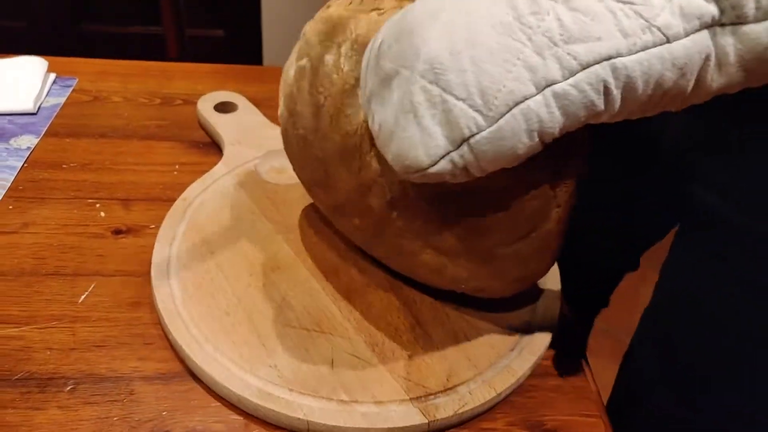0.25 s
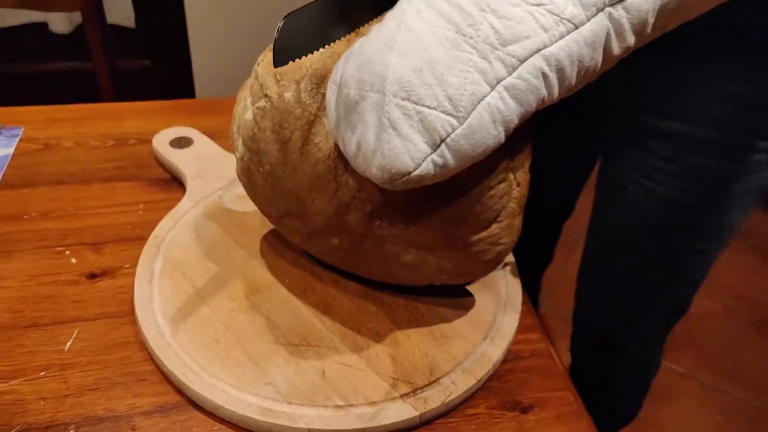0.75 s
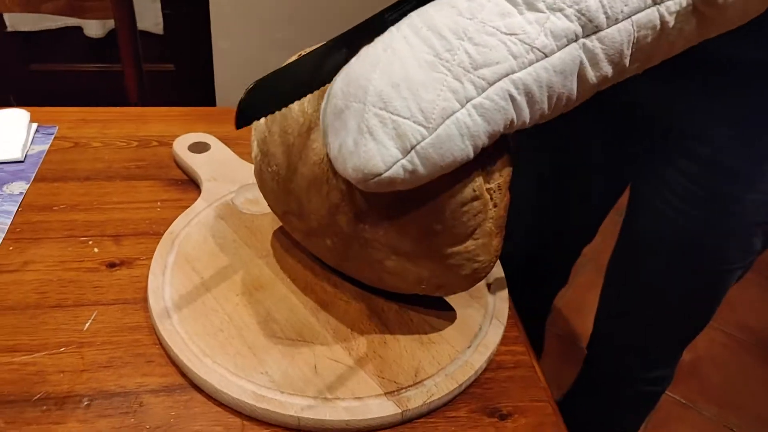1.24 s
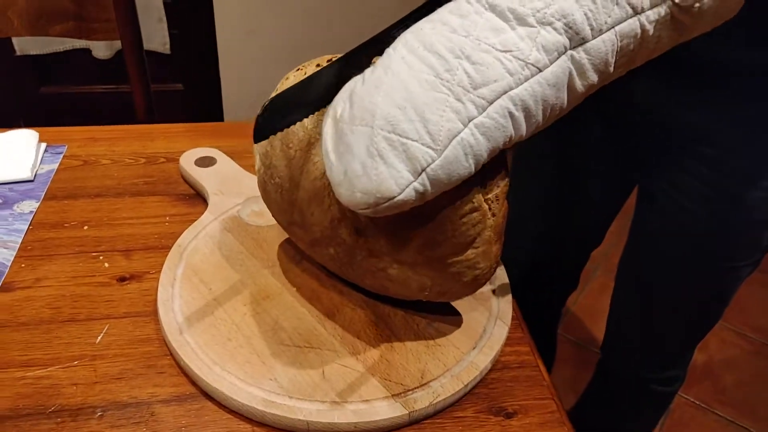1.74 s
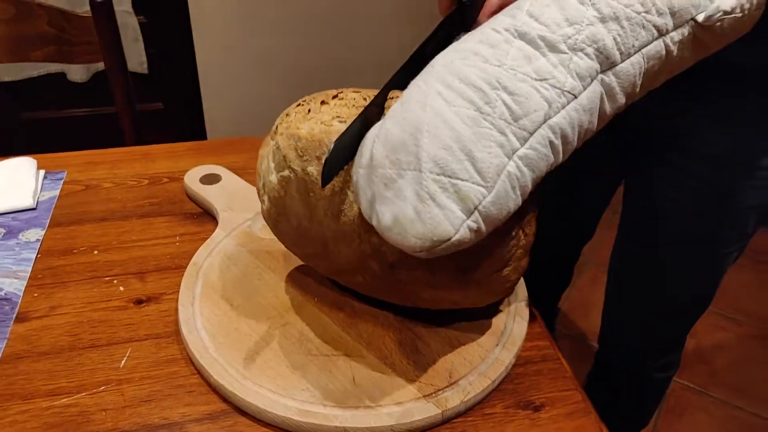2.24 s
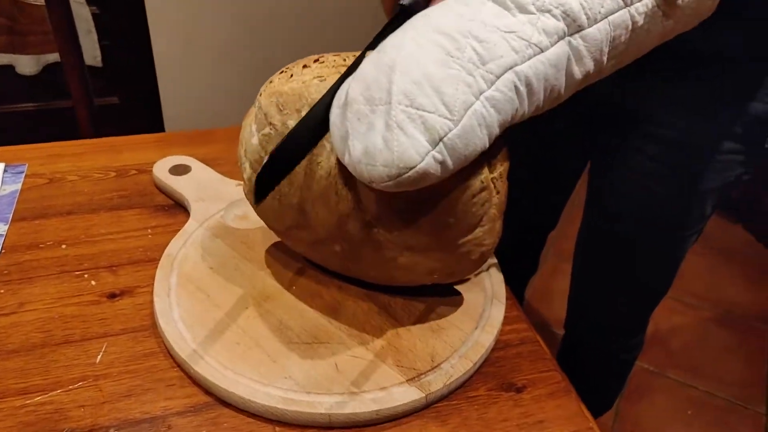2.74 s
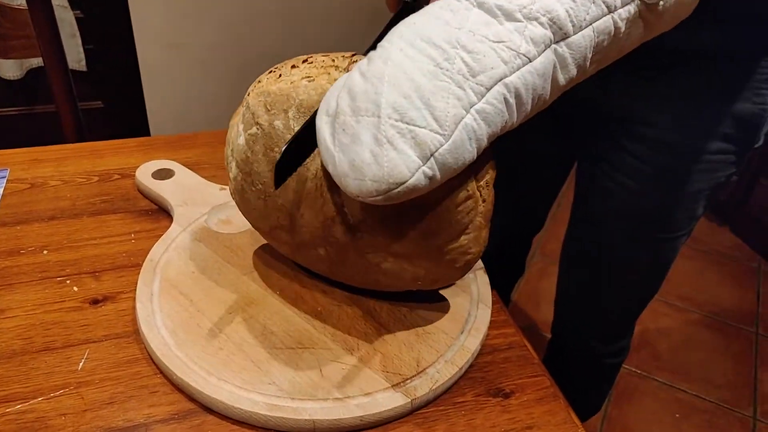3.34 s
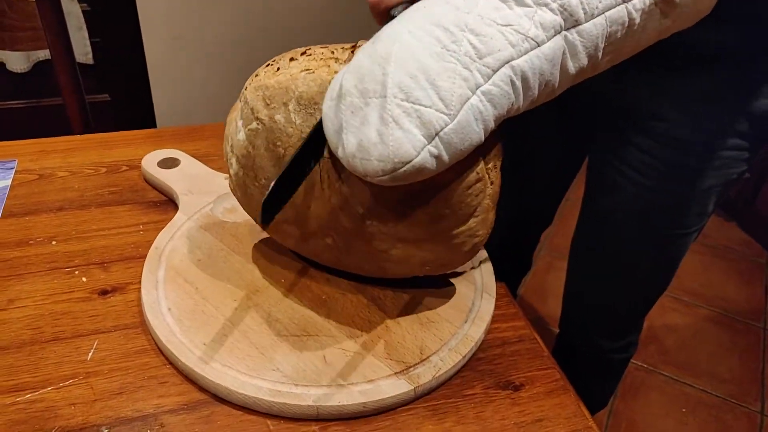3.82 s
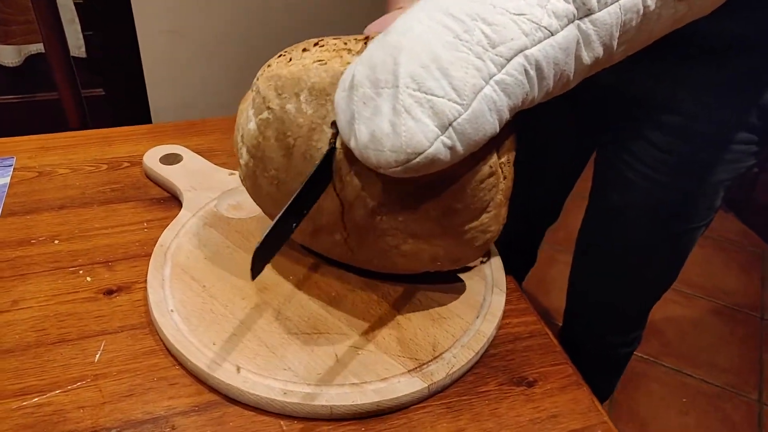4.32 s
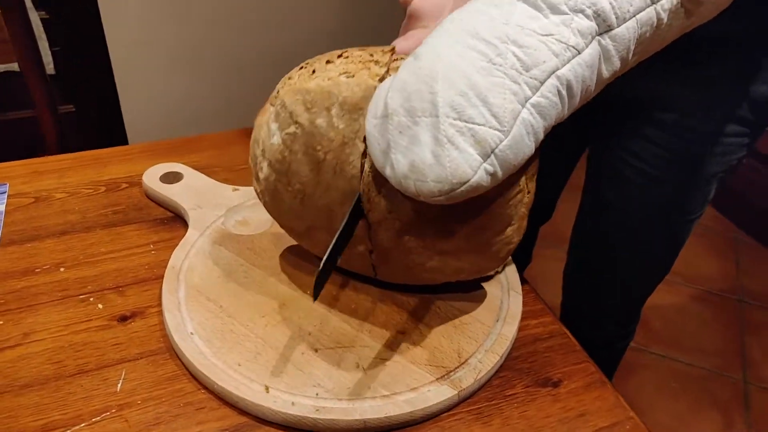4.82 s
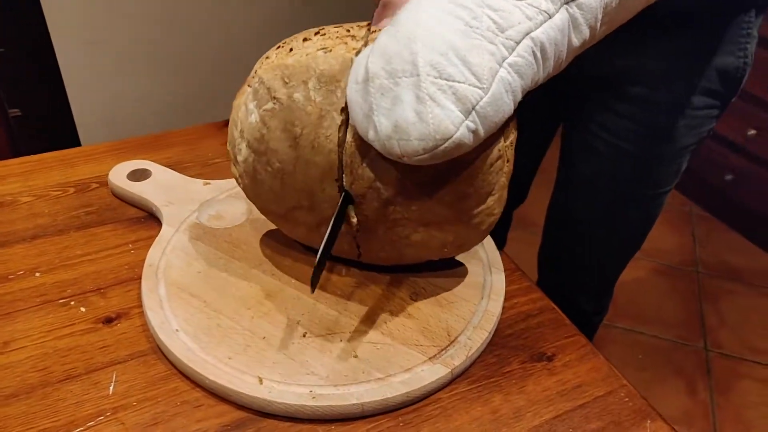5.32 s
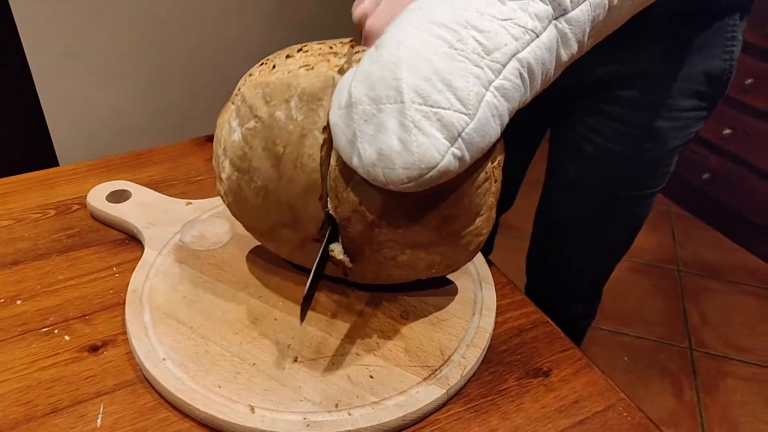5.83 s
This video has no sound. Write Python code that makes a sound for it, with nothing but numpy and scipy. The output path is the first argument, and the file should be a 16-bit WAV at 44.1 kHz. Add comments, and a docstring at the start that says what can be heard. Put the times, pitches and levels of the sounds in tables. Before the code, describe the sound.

An oven mitt briefly scuffs a crusty loaf as it is dragged and rocked on a wooden board. Then a serrated knife saws back and forth, about five strokes a second, light at first and soon firmer. Each stroke brings a rasp, a dull thump and a fine crackle, and larger flakes of crust snap off, more often later on. It is heard close up in a small kitchen with faint steady room noise.

```python
"""In a small kitchen, a serrated knife saws to and fro through a crusty loaf on a wooden board. First an oven
mitt scuffs the crust while the loaf is dragged and rocked into place. Each saw stroke then bites in with a
snap, builds, holds and dies away. Within a stroke the teeth catch and slip: every slip thumps loaf and board,
rasps the crust and sheds a spray of tiny fractures. Now and then a larger flake snaps off or a tooth catches
hard. Reflections of the small room and faint steady air surround it all."""
import sys
import numpy as np
from scipy import signal
from scipy.fft import rfft, irfft, next_fast_len
from scipy.io import wavfile
from scipy.ndimage import uniform_filter1d

SR = 44100
rng = np.random.default_rng(int(sys.argv[2]) if len(sys.argv) > 2 else 0)


def digitize_waveform(pressure):
    """Quantize a signal to 16-bit integers and store it at the path in sys.argv[1].

    Rows of a 2-D input are taken as channels; values are limited to [-1, 1].
    """
    field = np.atleast_2d(pressure).T
    bounded = np.clip(field, -1, 1)
    quanta = np.round(bounded * 32767).astype(np.int16)
    wavfile.write(sys.argv[1], SR, quanta)


N = 267687  # length in samples


def amp(db):
    """Turns decibels into gain."""
    return 10 ** (np.asarray(db) / 20)


def read(points, hz):
    """Reads a table of points joined by straight lines on a log-frequency axis."""
    f, value = np.transpose(points)
    return np.interp(np.log(hz + 1), np.log(f + 1), value)


def curves(rows, before=None):
    """Joins each column of a table by straight lines in time."""
    s, *columns = np.transpose(rows)
    t = np.arange(N) / SR
    return np.array([np.interp(t, s, column, left=before) for column in columns])


def unit(x):
    """Scales each response to energy 1."""
    return x / np.sqrt(np.sum(x ** 2, -1, keepdims=True) + 1e-20)


def ring(x, response):
    """Passes x through a response, channel by channel."""
    return signal.oaconvolve(np.atleast_2d(x), np.atleast_2d(response), axes=1)[:, :N]


def add(mix, s, sound):
    """Mixes a sound in at time s, in seconds."""
    part = mix[..., max(round(s * SR), 0):][..., :sound.shape[-1]]
    part += sound[..., :part.shape[-1]]


def colour(points, size=4096):
    """Makes the shortest causal click with a given spectrum (minimum phase)."""
    hz = abs(np.fft.fftfreq(size, 1 / SR))
    log_gain = np.log(amp(read(points, hz)))
    spectrum = np.exp(np.conj(signal.hilbert(log_gain)))
    return unit(np.fft.ifft(spectrum).real[:size // 2])


def steady(x, span_s):
    """Evens out the short-time power of a click train to about 1, so that the hand sets the level."""
    window = signal.windows.hann(2 * int(span_s * SR / 2) + 3)
    power = abs(signal.oaconvolve(x ** 2, window / window.sum(), "same"))
    return x / np.sqrt(power + 1e-9)


def clicks(per_s, spread_db):
    """Scatters random clicks of uneven size."""
    happens = rng.random(N) < per_s / SR
    size_db = spread_db * np.minimum(rng.exponential(1, N), 4)
    return happens * amp(size_db)


def flake(ring_s, alike, size=400):
    """Gives a flake its own brief shiver: fading noise, partly different on left and right."""
    shared, left, right = rng.standard_normal((3, size))
    alike = np.clip(alike, 0, 1)
    shiver = np.sqrt(alike) * shared + np.sqrt(1 - alike) * np.array([left, right])
    return unit(shiver * np.exp(-np.arange(size) / SR / ring_s))


def resonance(x, hz, q, db):
    """Strengthens or weakens one broad resonance by a level curve."""
    band = signal.lfilter(*signal.iirpeak(hz, q, SR), x)
    return x + (amp(db) - 1) * band


def sheen(x, db, centre_hz=14400):
    """Lets dry crust sparkle at the very top, more so where it is thin and brittle."""
    return resonance(x, centre_hz, q=2.13, db=db) * amp(-.2 * db)  # more sheen, less of the whole


def two_ears(z, hz, alike_hz):
    """Makes diffuse sound alike on both sides in the bass and unrelated in the treble."""
    same = np.exp(-(hz / alike_hz) ** 2)
    return np.array([z[0], same * z[0] + np.sqrt(1 - same ** 2) * z[1]])


# tone of the still air, only its shape counts: (f/Hz, level/dB per Hz)
AIR_SPECTRUM = [(25, -28), (60, 5), (130, 11), (350, 2.5), (1500, -8.5), (3000, -14.5), (6500, -18.5),
                (8500, -29), (15500, -28)]


def air(level_db=-45):
    """Faint steady noise of the room: random noise shaped to the tone of still air."""
    hz = np.fft.rfftfreq(N, 1 / SR)
    noise = rfft(rng.standard_normal((2, N)))
    z = two_ears(noise, hz, alike_hz=766) * amp(read(AIR_SPECTRUM, hz))
    return amp(level_db) * np.sqrt(N) * unit(irfft(z, N))


# how strongly the oven mitt brushes the crust: (t/s, level/dB)
MITT_BRUSHING = [(0, -83), (0.12, -56.5), (0.25, -49.5), (0.33, -68), (0.41, -47.5), (0.47, -88)]
# tone of one slip at the teeth, also used for dull scuffs and jolts: (f/Hz, level/dB per Hz)
TEETH_SPECTRUM = [(200, -15), (450, -5.5), (750, 2.5), (1300, -1.5), (1650, -8.5), (2200, -13), (3000, -18),
                  (5000, -28), (12000, -51)]
# tone of one tiny break or brush of the crust: (f/Hz, level/dB per Hz)
CRUST_SPECTRUM = [(600, -49), (1500, 4), (2400, 2.5), (3800, -0.5), (5200, 1.5), (6900, -1), (8200, -11.5),
                  (10500, -15), (13000, -16), (14500, -4), (15700, -9)]


def mitt(scuff_s=0.044, rise_s=0.0092, fade_s=0.011, scuff_db=-40.5):
    """Cloth takes hold with a dull scuff, then its fibres brush the crust in dense tiny clicks."""
    fibres = np.array([steady(clicks(5000, spread_db=1.5), span_s=.04) for _ in range(2)])
    age = np.maximum(np.arange(N) / SR - scuff_s, 0)
    fade = np.exp(-np.maximum(age - rise_s, 0) / fade_s)
    grab = amp(scuff_db) * np.minimum(age / rise_s, 1) * fade
    brushing = ring(fibres * amp(curves(MITT_BRUSHING)), colour(CRUST_SPECTRUM))
    return brushing + ring(fibres[0] * grab, colour(TEETH_SPECTRUM))


# tone of one push through the loaf: (f/Hz, level/dB per Hz)
LOAF_SPECTRUM = [(25, -24), (50, -22.5), (75, -12), (100, 3), (190, -2), (300, -2), (430, -6), (560, -12),
                 (800, -21.5), (1500, -42), (4000, -88)]
# low ringing notes set off by each push: (f/Hz, relative level/dB, time to fall by 60 dB/s)
LOW_MODES = [(100, 7.5, 0.32), (138.7, -4, 0.83), (161.3, 7.5, 1), (235.8, 1.5, 0.5), (287.4, 7, 0.36),
             (399.6, 2.5, 0.22), (619, -8, 0.6)]


def board(ring_db):
    """A dull push through the loaf, together with the fading low notes it sets off."""
    t = np.arange(SR // 2) / SR
    modes = sum(amp(db - 60 * t / t60) * np.sin(2 * np.pi * hz * t) for hz, db, t60 in LOW_MODES)
    response = amp(ring_db) * unit(modes)  # ring_db: ringing against the push
    add(response, 0, colour(LOAF_SPECTRUM))
    return unit(response)


# how strongly the loaf is dragged over the board: (t/s, level/dB)
DRAG_LEVEL = [(0.203, -27), (0.33, -35.5), (0.4, -26), (0.47, -40.5), (0.58, -61)]
# the loaf bumps on the board: (t/s, peak level before the room/dB)
LOAF_BUMPS = [(0.206, -23), (0.352, -14), (0.617, -14.5), (0.967, -16.5), (1.233, -11.5), (1.592, -0.5),
              (1.937, -5), (2.326, -10), (3.095, -11), (3.568, -3), (4.515, -10), (4.639, -7.5),
              (5.211, -18), (5.586, -8)]
# a hard edge of crust taps the board: (t/s, level before the room/dB)
EDGE_TAPS = [(0.3505, -19), (0.387, -22.5)]


def knocks(tap_hz=(846, 1100), tap_t60_s=0.015):
    """The loaf judders over the board and rocks against it; a hard edge of crust taps the wood."""
    judder = steady(clicks(400, spread_db=1.5) * rng.choice([-1, 1], N), span_s=0.099)
    out = ring(judder * amp(curves(DRAG_LEVEL, before=-120)), board(ring_db=2.5))[0]
    bump = board(ring_db=-5.5)
    for s, db in LOAF_BUMPS:
        add(out, s, amp(db) * bump / abs(bump).max())
    t = np.arange(SR // 10) / SR
    tap = np.mean([np.sin(2 * np.pi * hz * t) for hz in tap_hz], 0) * amp(-60 * t / tap_t60_s)
    for s, db in EDGE_TAPS:
        add(out, s, amp(db) * tap)
    return out


# the saw strokes: (start t/s, build/s, hold/s, thump of the loaf level/dB, rasp of the teeth level/dB,
#   crackle of the crust level/dB, boom of the table boost/dB, bite of the teeth boost/dB, sheen boost/dB)
SAW_STROKES = [(0.799, 0.024, 0.024, -29, -45, -53, 1, -9, 7),
               (0.926, 0.03, 0.014, -24.5, -37, -45, -4, -6, 12.5),
               (1.103, .011, 0.029, -22.5, -28, -41, 1, -11, 16.5),
               (1.202, 0.0046, 0.071, -18, -28.5, -34.5, -0.5, 3, 4),
               (1.372, 0.039, 0.041, -25.5, -33, -40.5, -10, -10, 5.5),
               (1.553, 0.021, 0.047, -15, -23.5, -34, -11, 4.5, 1),
               (1.724, 0.028, 0.031, -22.5, -31, -39.5, -1, -2, 4),
               (1.895, 0.035, 0.0063, -21, -28.5, -40, 5, -1, 4),
               (2.083, 0.0077, 0.051, -22, -27.5, -34.5, -2.5, -7, 4),
               (2.267, 0.013, .02, -45, -43, -41, -3, -3, 7),
               (2.314, 0.021, 0.063, -17, -23, -34, 13, 11.5, -1),
               (2.526, 0.029, 0.04, -28.5, -28, -36.5, -4, 3, 4),
               (2.728, 0.051, 0.021, -23, -27, -36, -1.5, -6.5, 0),
               (2.913, 0.042, .015, -23.5, -24.5, -33.5, 1, 6.5, 4),
               (3.081, 0.051, 0.038, -22.5, -26.5, -39, 1, 3.5, 2),
               (3.311, 0.014, 0.017, -24, -25, -33, 3, -1, 2.5),
               (3.483, 0.025, 0.04, -14.5, -20.5, -36.5, -1, 2, -2),
               (3.713, 0.027, 0.016, -22, -25.5, -39.5, 9, 6.5, 5),
               (3.884, .005, 0.058, -14.5, -19.5, -34.5, -2, 7.5, -1),
               (4.084, 0.005, 0.029, -21.5, -18.5, -40.5, 8, 3, 2.5),
               (4.255, 0.052, .055, -17.5, -23.5, -30.5, -2.5, 2, 1),
               (4.442, 0.0077, 0.029, -24.5, -28, -37.5, 9, -16, 1),
               (4.49, 0.02, 0.019, -18, -33, -40.5, 9, 8, 1),
               (4.646, 0.064, 0.054, -15.5, -22, -29.5, -9, -4, 5),
               (4.89, 0.022, 0.028, -16.5, -23, -35.5, 2, -2, 2),
               (5.085, 0.079, 0.055, -14, -25, -32, -6.5, -1, 4),
               (5.346, 0.022, 0.094, -25.5, -35, -44.5, -1, -7, 2),
               (5.584, 0.062, 0.066, -16.5, -24, -31, 2.5, 2.5, -0.5),
               (5.83, 0.012, 0.097, -23, -33, -41.5, 0, -12, 3),
               (6.062, 0.0073, 0.016, -16.5, -32, -39, -1, 9, 1)]


def rubbing(lead_s=.04, width_s=.028, turn_db=-9):
    """The blade rubs lightly between strokes, more softly where it turns round just before each one."""
    t = np.arange(0, N / SR, .004)  # a coarse time grid is enough
    distance_s = t[:, None] + lead_s - np.transpose(SAW_STROKES)[0]
    turning = np.exp(-(distance_s / width_s) ** 2).max(1)
    return np.interp(np.arange(N) / SR, t, amp(turn_db * turning))


def effort(peaks_db, take_up_db_per_s, entry_db, climb_db_per_s, swell_db, linger_s, fall_db_per_s, rest_db):
    """Each stroke takes up the strain, bites in, builds, swells and dies away over a light rubbing."""
    t = np.arange(N) / SR
    power = (amp(rest_db) * rubbing()) ** 2
    for (start, build, hold, *_), peak_db in zip(SAW_STROKES, peaks_db):
        near = slice(max(int((start - .1) * SR), 0), int((start + .6) * SR))
        age, build, hold = t[near] - start, max(build, 1e-3), max(hold, 1e-3)
        length = build + hold + linger_s
        take_up_db = take_up_db_per_s * np.minimum(age, 0)  # strain grows before the start
        build_db = (entry_db - climb_db_per_s * build) * np.clip(1 - age / build, 0, 1)
        arch_db = swell_db * np.sin(np.pi * np.clip(age / length, 0, 1))
        release_db = -fall_db_per_s * np.maximum(age - length, 0)
        power[near] += amp(peak_db + take_up_db + build_db + arch_db + release_db) ** 2
    return np.sqrt(power)


def hand(touch_s=.54, settle_s=.2):
    """How hard the strokes drive loaf, teeth and crust, and how the tone shifts from cut to cut."""
    t = np.arange(N) / SR
    start, build, hold, thump_db, rasp_db, crackle_db, *tone_db = np.transpose(SAW_STROKES)
    contact = np.clip((t - touch_s) / settle_s, 0, 1)  # the blade settles on the crust
    thump = contact * effort(thump_db, take_up_db_per_s=388, entry_db=-3.5, climb_db_per_s=17,
                             swell_db=2.0, linger_s=0.0037, fall_db_per_s=194, rest_db=-39.5)
    rasp = contact * effort(rasp_db, take_up_db_per_s=800, entry_db=-4.5, climb_db_per_s=55,
                            swell_db=1.47, linger_s=.006, fall_db_per_s=270, rest_db=-42)
    crackle = contact * effort(crackle_db, take_up_db_per_s=891, entry_db=1.0, climb_db_per_s=111,
                               swell_db=1.36, linger_s=0.0013, fall_db_per_s=203, rest_db=-47.0)
    boom_db, bite_db, sheen_db = curves(np.transpose([start + build + hold / 2, *tone_db]))
    return thump, rasp, crackle, boom_db, bite_db, sheen_db


def stroke_snaps(count=5, catch_db=22, dull_db=9, gentle_db_per_s=-117,
                 chip_db=18, spread_db=11, crumb_db=-25, crumb_fall_s=.15):
    """A stroke opens with a snap, chips the crust and drops crumbs: rows (t/s, level/dB, dull part/dB)."""
    rows = []
    chances = rng.random((len(SAW_STROKES), count, 4))
    for (start, build, hold, _, _, crackle_db, *_), chance in zip(SAW_STROKES, chances):
        # a stroke that builds slowly opens with a softer snap
        rows.append((start, crackle_db + catch_db + gentle_db_per_s * build, dull_db))
        for when, size, fall, crumb in chance:
            chip_s = start + when * (build + hold)
            crumb_s = start + build + hold + fall * crumb_fall_s
            rows.append((chip_s, crackle_db + chip_db - spread_db * size, dull_db))
            rows.append((crumb_s, crumb_db - spread_db * crumb, dull_db))
    return rows


# large flakes of crust snap off, or the teeth catch hard; the first two rows are the sharp ticks of a hard
# crust edge tapping the board: (t/s, level/dB, dull part against the sharp part level/dB)
SNAPS_AND_CATCHES = [(0.3505, -13.5, -15), (0.388, -20, -14), (0.961, -11.5, -14), (0.968, -13, -5),
                     (1.109, -15, 11), (1.209, -7.5, 1), (1.527, -9.5, 2), (1.94, -10.5, 10), (2.396, -8, 10),
                     (2.522, -16, 0), (2.91, -15, 5), (2.953, -4.5, 6), (3.134, -2.5, -3), (3.165, -2, -7),
                     (3.448, -18, 8), (3.469, -9, 5), (3.49, -2, 8), (3.501, -4.5, 10), (3.515, -4.5, 13.5),
                     (3.567, -22, 18), (3.895, -8, 3), (3.905, -5, 6), (3.914, -10, 11), (3.941, -1.5, -2),
                     (4.043, -6.5, 10), (4.087, -0.5, -18), (4.296, -1.5, 5), (4.441, -15.5, 14),
                     (4.457, -14, 11), (4.682, -5.5, 4), (4.736, -9, 10), (4.753, 6.5, 4), (4.894, -16, 18),
                     (5.12, -12, -5), (5.164, 0, -24), (5.204, 6, -14), (5.211, 2.5, 1.5), (5.345, -11.5, 2.5),
                     (5.694, 5, -2), (5.701, 0.5, -7)]


def snaps():
    """A flake breaks, a tooth catches hard or a crust edge taps the board: a sharp tick and a duller jolt of
    the crust around it."""
    ticks, jolts = np.zeros((2, 2, N))
    tick, jolt = colour(CRUST_SPECTRUM), colour(TEETH_SPECTRUM)
    for s, db, dull_db in list(SNAPS_AND_CATCHES) + stroke_snaps():
        add(ticks, s, amp(db) * unit(ring(flake(ring_s=.0011, alike=.35), tick)))
        add(jolts, s, amp(db + dull_db) * unit(ring(flake(ring_s=.0009, alike=.85), jolt)))
    sheen_db = hand()[-1]
    return sheen(ticks, sheen_db) + jolts


def scatter(train, ring_s, alike, count=31):
    """Gives each click to one of the few flakes under the teeth, which change as the blade moves on."""
    which = (np.arange(N) // 1500 + rng.integers(0, 4, N)) % count
    return sum(ring(train * (which == k), flake(ring_s, alike)) for k in range(count))


def sweep(x, pitch, width_hz, db, wander_depth=.06):
    """Strengthens or weakens a resonance that follows a pitch curve and wanders about it."""
    wander = uniform_filter1d(rng.standard_normal(N), size=2500) * np.sqrt(2500)
    hz = curves(pitch)[0] * np.exp(wander_depth * wander)
    # shift the moving pitch down to zero, keep a narrow band there, shift it back
    turn = np.exp(2j * np.pi * np.cumsum(hz) / SR)
    r = np.exp(-np.pi * width_hz / SR)
    band = 2 * (turn * signal.lfilter([1 - r], [1, -r], x / turn)).real
    return (x + (amp(db) - 1) * band) * amp(-.35 * db)


# the hollow resonance of the loaf, which shifts as it is gripped and cut: (t/s, f/Hz)
HOLLOW_PITCH = [(1.9, 382), (2.35, 290), (4.45, 285), (4.9, 420), (5.15, 298.3), (5.65, 406)]
# the resonance of the crust under the teeth: (t/s, f/Hz)
CRUST_BITE_PITCH = [(1.6, 1190), (2.36, 1621), (2.57, 1180), (2.95, 1380), (3.13, 899), (3.52, 1102),
                    (4.1, 1053), (4.3, 1281)]


def sawing(teeth_per_s=94, unevenness=.36, catch_s=0.0076, spray_s=0.021, boom_hz=108):
    """Tooth after tooth catches and slips: a push, a short burst of rasp and a spray of fractures."""
    thump, rasp, crackle, boom_db, bite_db, sheen_db = hand()
    speed = np.clip(rasp / amp(-28), .1, 2) ** .2  # a strong stroke is faster; 1 at a rasp of -28 dB
    yielding = np.repeat(rng.standard_normal(N // 128 + 1), 128)[:N]
    grip = np.exp(unevenness * yielding)  # crust yields unevenly
    teeth_passed = np.floor(np.cumsum(teeth_per_s * speed * grip) / SR)
    slip_size = amp(3.8 * np.clip(rng.standard_normal(N), -2, 2))
    slips = np.diff(teeth_passed, prepend=0) * slip_size
    # each slip leaves a brief fading trail of rasp and a longer one of fractures
    catch, spray = (signal.lfilter([1], [1, -np.exp(-1 / (s * SR))], slips) for s in (catch_s, spray_s))

    spring_back = uniform_filter1d(slips, size=300)  # of the loaf around each push
    grains = 0.21 * clicks(500, spread_db=3.5) * rng.choice([-1, 1], N)
    pushes = steady(slips - spring_back + grains, span_s=0.13)
    scrapes = slips + .4 * clicks(2400, spread_db=2.2) * (catch + .1)
    fractures = clicks(4200, spread_db=3.2) * (spray + .2)

    loaf = steady(ring(pushes, colour(LOAF_SPECTRUM))[0], span_s=0.046) * thump
    wood = ring(pushes * thump, board(ring_db=42))
    scrapes = steady(scrapes * rng.choice([-1, 1], N), span_s=0.033) * rasp
    blade = ring(scatter(scrapes, ring_s=0.0018, alike=0.63), colour(TEETH_SPECTRUM))
    fractures = steady(fractures, span_s=0.055) * crackle
    crumbs = ring(scatter(fractures, ring_s=0.00043, alike=0.5), colour(CRUST_SPECTRUM))

    # a resonance that grows takes energy from the rest of its layer
    body = resonance(amp(-3.5) * loaf + amp(-12.5) * wood, boom_hz, q=1.54, db=boom_db)
    hollow = sweep(body * amp(-.2 * boom_db), HOLLOW_PITCH, width_hz=111, db=2.5)
    bite = sweep(amp(-2.5) * blade, CRUST_BITE_PITCH, width_hz=470, db=bite_db)
    return hollow + bite + sheen(crumbs, sheen_db)


# how long the kitchen rings: (f/Hz, time to fall by 60 dB/s)
KITCHEN_DECAY = [(100, 0.36), (250, 0.3), (600, 0.56), (1500, 0.42), (4000, 0.47), (16000, 0.25)]


def kitchen(x, tail_db=-8.0, early_db=-9, early_s=0.0048, bass_db=-6):
    """Adds quick reflections from the table top and the tail of a small tiled room, from fading noise."""
    t = np.arange(SR // 2) / SR
    hz, when, z = signal.stft(rng.standard_normal((2, len(t))), SR, nperseg=256)
    tone_db = read([(150, bass_db), (500, 0.26), (1500, -1.05)], hz)
    z = two_ears(z, hz[:, None], alike_hz=580) * amp(tone_db)[:, None]
    decay = amp(-60 * when / read(KITCHEN_DECAY, hz)[:, None])
    tail = signal.istft(z * decay, SR, nperseg=256)[1][:, :len(t)]
    tail = unit(tail * np.clip(t / 0.0082, 0, 1) ** 2)  # the tail fades in
    early = signal.istft(z, SR, nperseg=256)[1][:, :len(t)][:, ::-1]  # reversed, to differ from the tail
    early = unit(early * np.exp(-t / early_s) * (t > .001))
    return x + ring(x, amp(tail_db) * tail + amp(early_db) * early)


def scene():
    """Sawing, snaps, knocks and the mitt in the kitchen, over its still air."""
    return kitchen(sawing() + snaps() + knocks() + mitt()) + air()


# how the left side differs in level from the right: (f/Hz, left minus right level/dB)
LEFT_RIGHT_LEAN = [(100, 1), (400, 1), (1000, 2), (2200, 2), (3800, 1), (5300, -9.5), (6600, 9),
                   (7800, -4.5), (10000, -3), (15000, -5)]


def record(dry, lead_s=.00006, low_cut_hz=56, ceiling=0.67, edge_hz=15900):
    """Two microphone ports of different colour, the left a little nearer; low cut, soft overload, band limit."""
    hz = np.fft.rfftfreq(next_fast_len(N + SR // 2), 1 / SR)
    # each side takes half of the level difference and half of the lead
    port = amp(read(LEFT_RIGHT_LEAN, hz) / 2) * np.exp(1j * np.pi * hz * lead_s)
    heard = irfft(rfft(dry, 2 * (len(hz) - 1)) * np.array([port, 1 / port]))[:, :N]
    heard = signal.sosfilt(signal.butter(3, low_cut_hz, "highpass", fs=SR, output="sos"), heard)
    heard = heard / (1 + (heard / ceiling) ** 6) ** (1 / 6)  # soft overload
    band_limit = signal.firwin(401, edge_hz, window=("kaiser", 8), fs=SR)
    return signal.oaconvolve(heard, band_limit[None], "same")


dry = scene()
out = record(dry)
digitize_waveform(out)
```